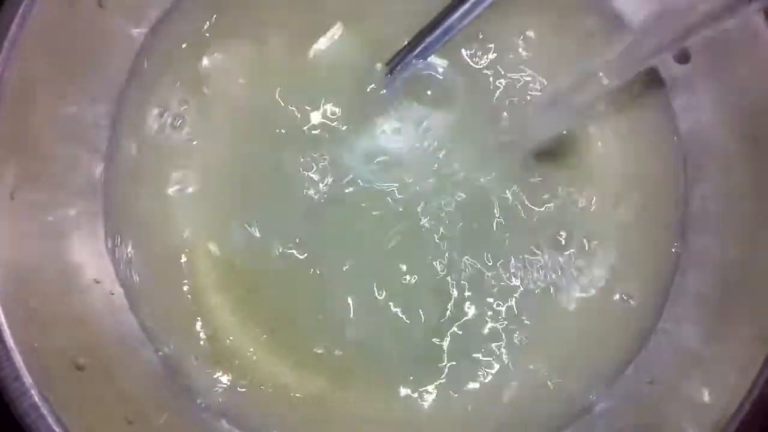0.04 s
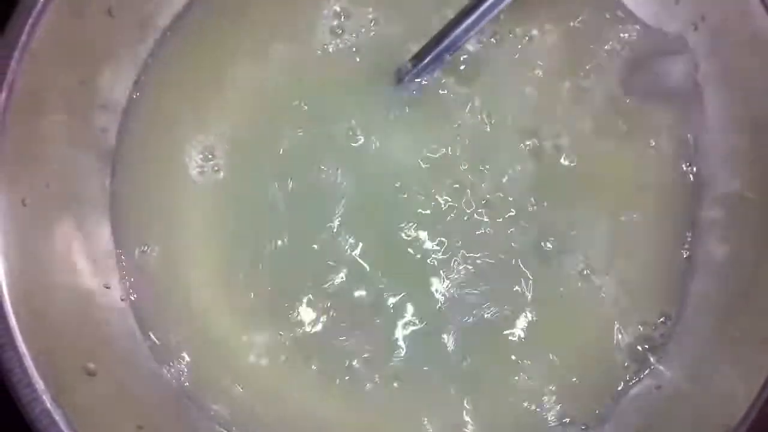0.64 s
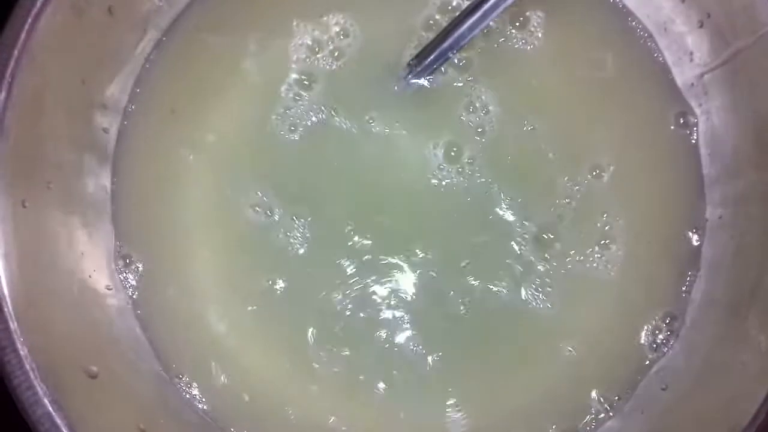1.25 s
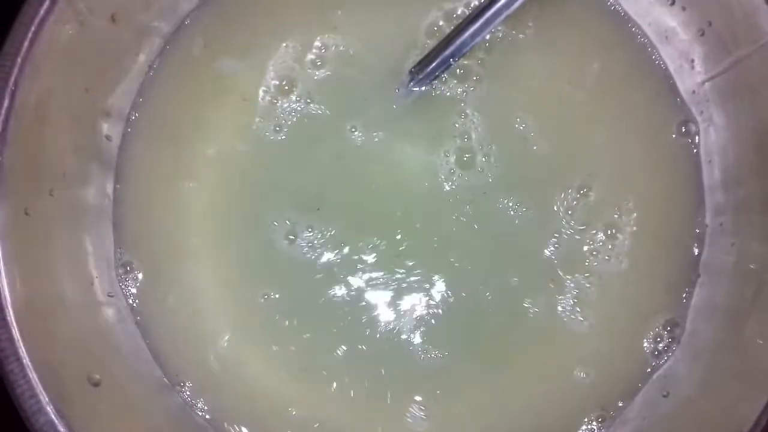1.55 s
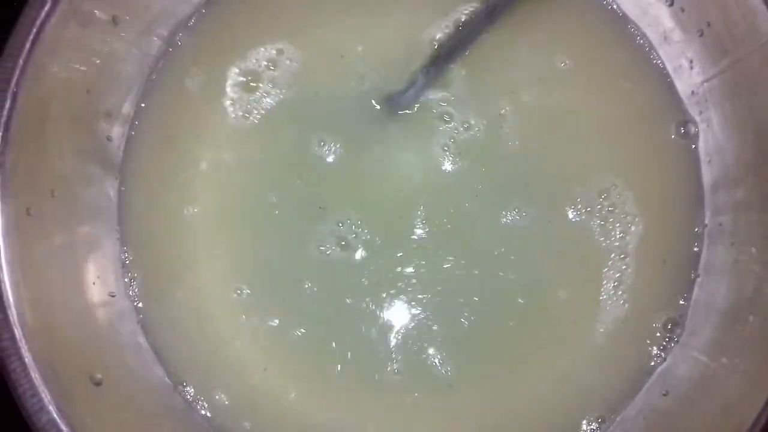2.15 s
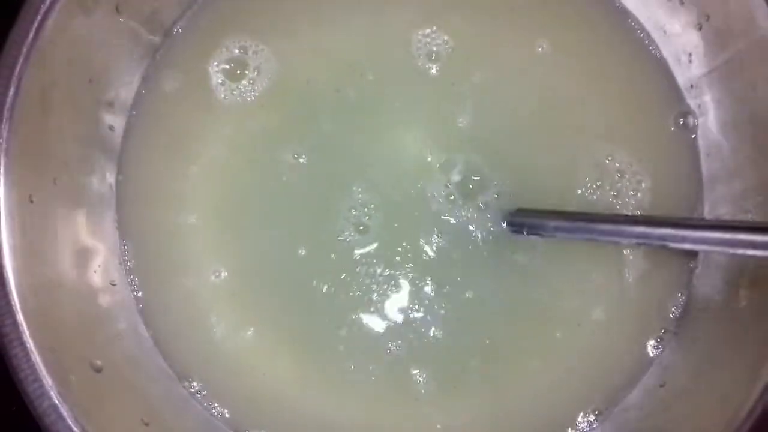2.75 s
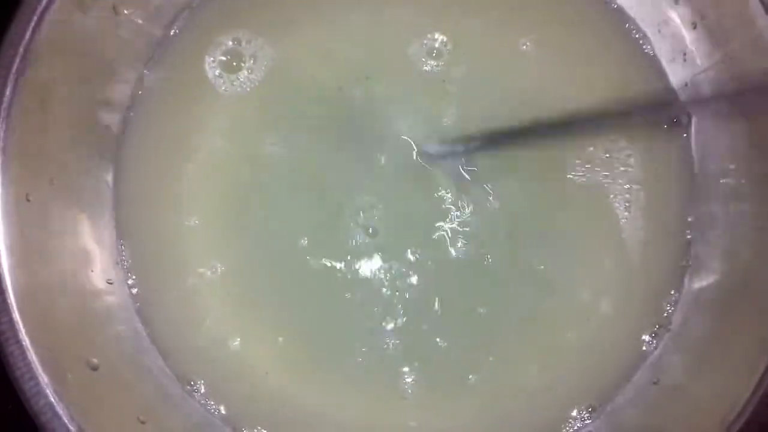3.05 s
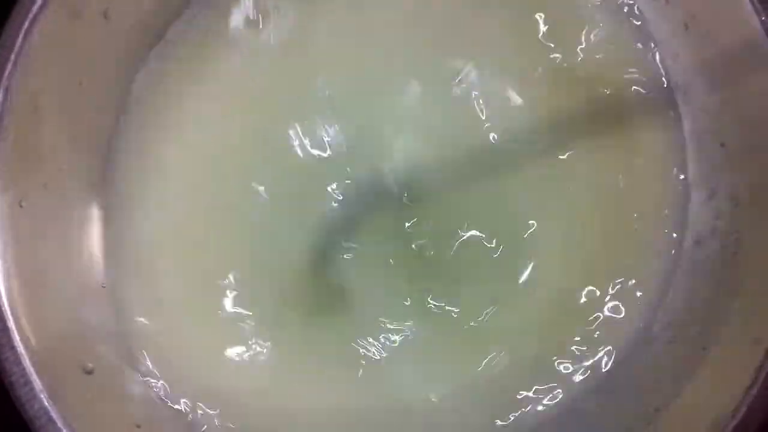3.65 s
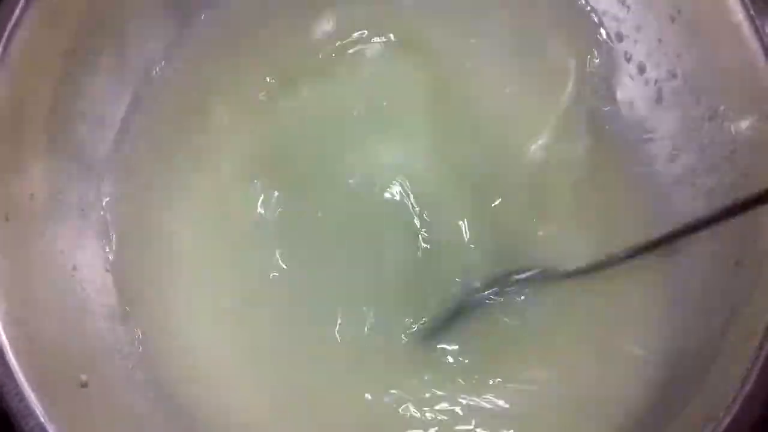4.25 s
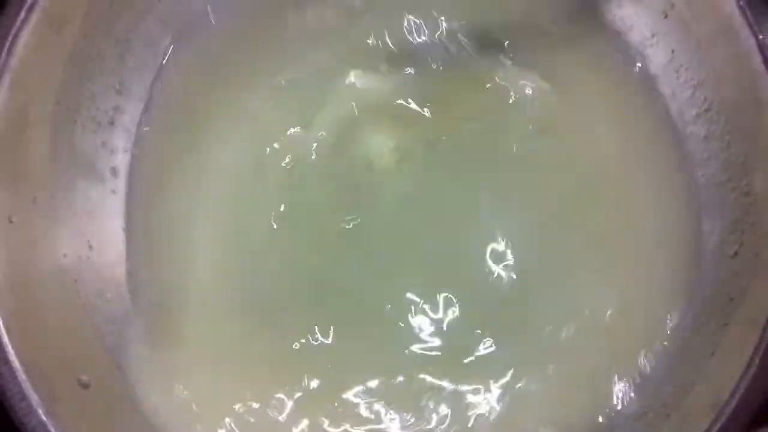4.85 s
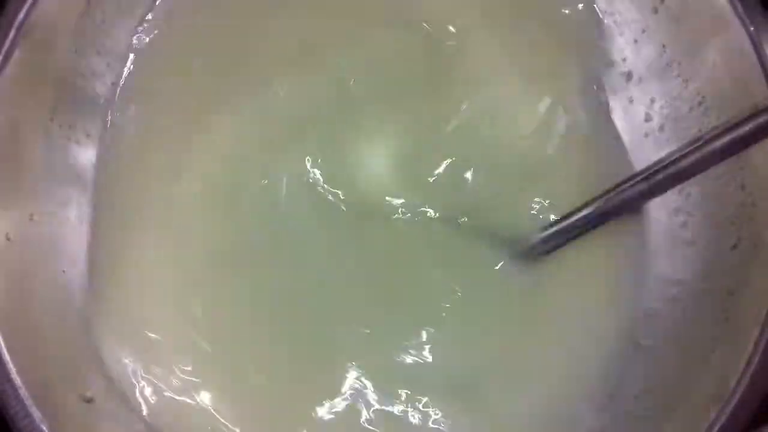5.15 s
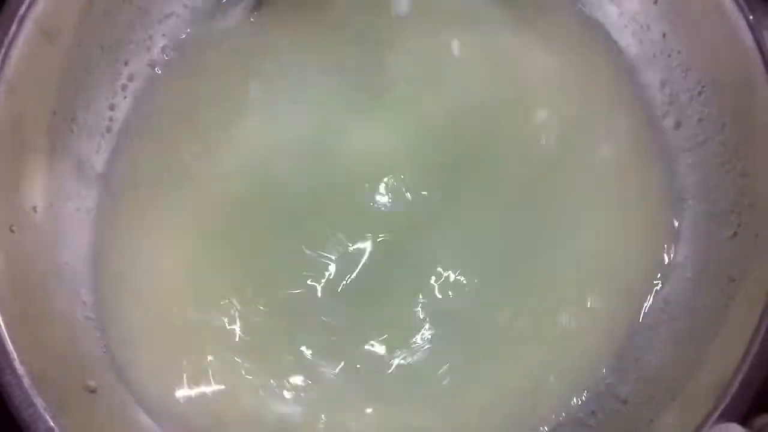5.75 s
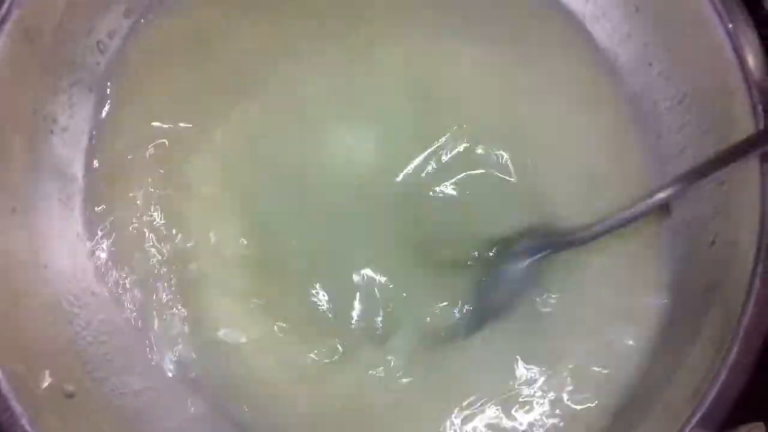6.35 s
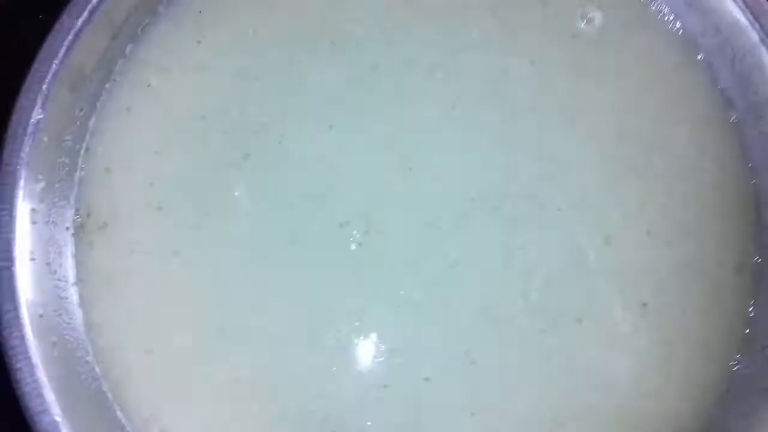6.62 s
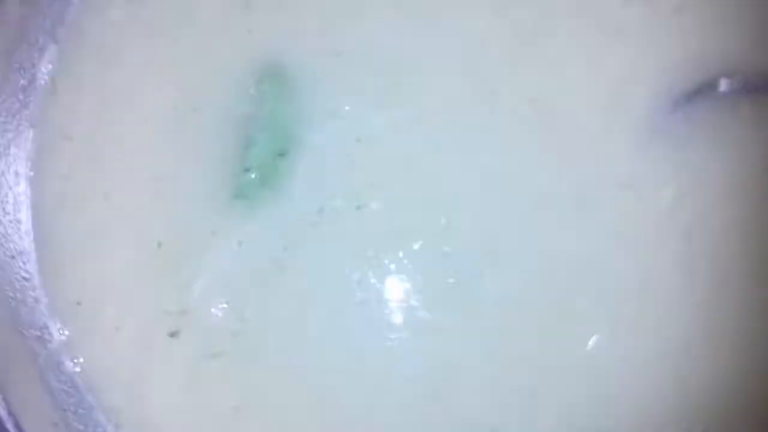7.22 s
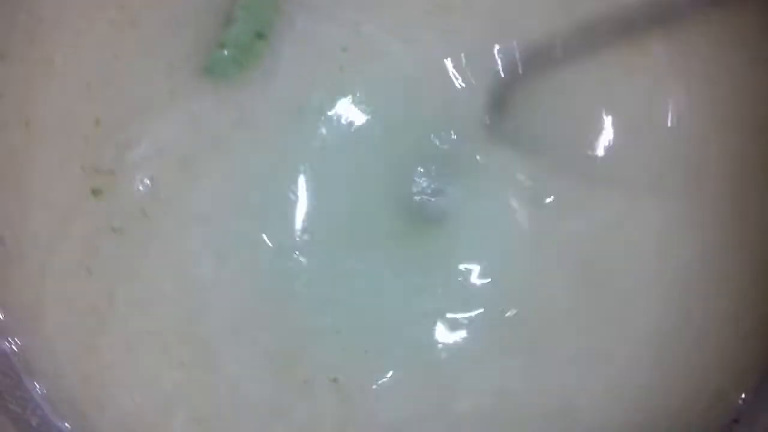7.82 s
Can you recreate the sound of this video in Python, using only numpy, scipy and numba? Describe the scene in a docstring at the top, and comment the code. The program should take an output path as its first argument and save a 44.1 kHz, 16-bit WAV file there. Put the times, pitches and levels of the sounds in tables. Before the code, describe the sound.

For the first 0.7 seconds a thin stream splashes into liquid in a steel bowl, with sharp drops and small gurgles. Foam then fizzes quietly until about 3.4 seconds. At 1.7 seconds a pan is set down nearby with a hollow boom. From 2.1 to 2.7 seconds a metal spoon slides and clatters brightly against the rim. The hardest clink, at 2.5 seconds, makes everything duck for over a second. From 3 seconds the spoon stirs in uneven strokes, scraping steel, sloshing and knocking under the liquid. A harsher scrape, several clinks and a tiny squeak come just after 4 seconds. Lighter stirring continues until 6.5 seconds, pauses, and returns at 7.6 seconds with plops, a clink and scraping. Everything sounds close, with a short small-room echo over steady kitchen noise. A faint, very high electric whine grows towards the end.

```python
"""A thin stream splashes into liquid in a steel bowl and leaves fizzing foam. A pan is set down
nearby with a hollow boom. Just after two seconds a metal spoon slides and clatters against the rim;
at the hardest clink the microphone's overload guard turns everything down for a while. Then the
spoon stirs, scraping the steel and knocking under the liquid. Kitchen noise and a thin whine lie
behind it all, and the whine grows towards the end."""
import sys
import numpy as np
from scipy import signal
from scipy.fft import rfft, irfft
from scipy.io import wavfile
from scipy.ndimage import uniform_filter1d
from numba import njit

SR = 44100
rng = np.random.default_rng(int(sys.argv[2]) if len(sys.argv) > 2 else 0)


def store_pcm(level_fs):
    """Save levels as 16-bit WAV."""
    pcm = np.round(np.clip(level_fs, -1, 1) * 32767).astype(np.int16)
    wavfile.write(sys.argv[1], SR, np.atleast_2d(pcm).T)


N = 351918
T = np.arange(N) / SR
RING = T[:SR].astype(np.float32)  # one second of time for a single hit
TOP_HZ = 16200
STROKE_ATTACK_S, DRAG_RELEASE_S = 0.013, 0.004  # the spoon leans in; a caught edge lets go at once

# the tones (modes) of the filled bowl and of the spoon: f/Hz, level/dB, time to fade by 60 dB/s
BOWL_MODES = [(980, -6.5, 0.51), (1480, -1.5, 0.28), (1940, 1, 0.12), (2121, -6, 0.41), (2640, 2.5, 0.09),
              (2770, -15, 0.11), (3450, -18, .14), (3940, -5.5, 0.37), (4230, -18, 0.23), (4500, -2, 0.24),
              (5100, -10, 0.15), (5334, -20, .18), (5490, 15.5, 0.052), (5730, -6, 0.25),
              (5600, 6.5, 0.183), (6660, -3, .28), (6900, -3, 0.18), (7500, -6, .2), (8530, -10, .16),
              (8545, -7.5, .16), (7800, -8, .16), (8900, -6, 0.2), (10370, -13, .13), (9911, -19, 0.18),
              (10230, -9.5, 0.17), (10400, -9, 0.11)]
SPOON_MODES = [(1376, -5, 0.38), (2440, -13.5, 0.201), (4748, -22, 0.82), (7060, -5, 0.3),
               (7680, 17.5, 0.095), (7573, -0.5, 0.26), (9070, -2.5, 0.86), (8650, -2.5, 0.56),
               (9440, -29, .27), (9270, -4, .2), (9900, 7, 0.087), (9701, -34, .25), (10400, -3, 0.46)]
# tone colours of a hit on the bowl's wall, a hit on the spoon, and landing drops: f/Hz, level/dB
WALL_COLOUR = [(150, -40.5), (700, -10.5), (1700, -7.5), (2700, -10), (3600, -13.5), (5600, -5),
               (7500, -0.5), (9000, 0.5), (10200, 1), (12000, -13), (15500, -31.5)]
SPOON_COLOUR = [(150, -64), (600, -22), (1300, -9), (3300, -17), (4600, -9), (6200, -14.5), (7700, 1),
                (9200, 3), (10200, -15.5), (12500, -29.5), (15500, -62)]
SPATTER_COLOUR = [(200, -34), (1000, -17.5), (3000, -15.5), (4500, -6.5), (5300, -4), (7000, -1.5),
                  (9200, 5.5), (10200, -2), (12300, -14), (15500, -34.5)]
# stirring strokes: t/s, length/s, rubbing/dB, sloshing/dB, spoon's share of the sound (0-1)
STROKES = [(2.96, 0.013, -32.5, -38.5, 1), (3.185, 0.042, -41.5, -42, 0.95), (3.261, 0.14, -43, -62, 0.95),
           (3.6, 0.25, -43.5, -57, 0.8), (3.946, 0.11, -43, -44, 0.9), (4.14, 0.047, -34, -29, 0.8),
           (4.275, 0.044, -43.5, -48, 0.9), (4.35, 0.058, -36.5, -64, 0.93), (4.442, 0.25, -45, -54, 0.45),
           (4.818, 0.11, -50, -40.5, 1), (4.902, 0.24, -41, -49.5, 0.53), (5.745, 0.084, -35.5, -50, 1),
           (5.843, 0.033, -35.5, -62, 0.98), (5.91, 0.055, -50.5, -60, 0.8), (6, 0.17, -49.5, -49, 0.74),
           (6.208, 0.16, -40, -44.5, 0.6), (6.391, 0.087, -38, -37, 0), (7.686, 0.26, -37.5, -66, 0.11),
           (7.915, 0.1, -35.5, -56, 0.54)]


def clatter():
    """The spoon hits the bowl and both ring; the hardest blow also jolts the bowl with a dull thud."""
    # hits: t/s, level/dB, spoon's share of the sound (0-1)
    clinks = [(2.126, -17, 0.3), (2.291, -27, 0.47), (2.315, -11.5, 0), (2.327, -21, 0), (2.342, -22.5, 0),
              (2.388, -12, 0.21), (2.431, -17.5, 0.2), (2.445, -14.5, 0.43), (2.461, -22.5, 0),
              (2.472, -24.5, 0), (2.483, -18, 0.7), (2.517, 2, 1), (2.547, -7, 1), (2.571, -3.5, 0.9),
              (2.608, -9, 1), (2.631, -11.5, 0.9), (4.034, -10.5, 0.37), (4.082, -20, 0.1),
              (4.127, -19.5, 0.3), (4.17, -18, 0.6), (4.914, -30.5, 0.77), (5.698, -32.5, 0.77),
              (5.72, -31.5, 0.6), (5.77, -26.5, 0.65), (7.628, -36.5, 0.44), (7.685, -21, 0.5)]
    out = np.zeros(N)
    for s, db, share in clinks:
        wall = steel(WALL_COLOUR, BOWL_MODES, crack_t60=0.029, grit_db=-18.5, ring_db=-7.5,
                     shimmer_db=-32, shimmer_t60=0.1735)
        spoon = steel(SPOON_COLOUR, SPOON_MODES, crack_t60=0.025, grit_db=-21, ring_db=-21.5,
                      shimmer_db=-13.5, shimmer_t60=0.57)
        glance = 1 - np.exp(-RING / 0.00053)  # a glancing hit builds up over a moment
        add(out, s, amp(db) * unit_start(glance * ((1 - share) * wall + share * spoon)))
    s, db, _ = max(clinks, key=lambda row: row[1])
    add(out, s + 0.0023, amp(db - 7.5) * sine(215) * fade(0.016))
    add(out, s + 0.00097, amp(db - 7) * burst(0.011, [(200, -5), (900, 5), (3000, -6), (9000, -10.5)]))
    return out


def scraping():
    """The spoon sticks and slips in tiny clicks: harsh on the dry wall, lighter under the liquid."""
    # hard drags on the dry wall: t/s, length/s, level/dB, lows and mids against the treble/dB
    drags = [(2.091, 0.025, -14.5, -5.5), (4.041, 0.11, -18, -0.5)]
    # tone colour of the wet wall: f/Hz, level/dB
    wet_colour = [(150, -26), (700, -27), (1300, -5), (1850, 5), (2700, -6), (3600, 3.5), (5000, -5.5),
                  (7000, -4), (8900, -4.5), (10200, -4.5), (12000, -22.5), (15500, -24)]
    slips = colour(clicks(rate=2900, spread_db=1.5),
                   [(400, -12), (2000, 3), (3500, 3.5), (6000, 2.5), (7500, -5.5), (9600, 7.5),
                    (12000, -5)])
    drag = on_bowl = on_spoon = 0
    for s, length, db, body_db in drags:
        shaped = colour(slips, [(100, body_db), (3000, body_db), (5500, 0)])
        drag += amp(db) * shaped * gate(s, length, STROKE_ATTACK_S, DRAG_RELEASE_S)
    drag *= amp(2 * drift(250))
    wet_slips = colour(clicks(rate=2200, spread_db=2),
                       [(200, -20), (2000, -2), (3800, -4), (5800, 3), (9500, 1.5), (13000, 7.5)])
    rub = wet_slips * amp(2 * drift(45) - 1.5)
    for s, length, db, _, share in STROKES:
        force = amp(db) * gate(s, length, STROKE_ATTACK_S, release_s=0.026)
        on_bowl += force * np.sqrt(1 - share)
        on_spoon += force * np.sqrt(share)
    return (slide(drag, WALL_COLOUR, BOWL_MODES, ring_db=-22.5)
            + slide(rub * on_bowl, wet_colour, BOWL_MODES, ring_db=-21)
            + slide(rub * on_spoon, SPOON_COLOUR, SPOON_MODES, ring_db=-22))


def steel(points, modes, crack_t60, grit_db, ring_db, shimmer_db, shimmer_t60):
    """One touch on metal: a crack, then tones and a noisy shimmer that liquid and hand cut short."""
    tones = amp(ring_db) * unit_start(ring(modes, scatter_db=2.9))
    shimmer = amp(shimmer_db) * burst(shimmer_t60, points)
    return crack(crack_t60, points, grit_db) + fade(0.55) * (tones + shimmer)


def slide(force, points, modes, ring_db, count=5):
    """A rubbing edge moves between spots on the metal that each ring in their own way."""
    weights = amp([10 * drift(22) for _ in range(count)])
    weights /= np.linalg.norm(weights, axis=0)
    spots = [steel(points, modes, crack_t60=0.0077, grit_db=-1.5, ring_db=ring_db,
                   shimmer_db=-37, shimmer_t60=0.11) for _ in range(count)]
    return sum(through(force * w, spot / np.linalg.norm(spot)) for w, spot in zip(weights, spots))


def squeaking():
    """For a moment the slips fall in step with a tone of the metal: a rough, wavering squeak."""
    # the edge catches: t/s, length/s, level/dB, f/Hz
    squeaks = [(4.104, 0.05, -32, 1900), (6.396, 0.051, -37, 1900)]
    # tones in a squeak: multiple of its pitch, level/dB
    partials = [(1, 3), (2.58, -3.5)]
    wavering_time = np.cumsum(1 + 0.066 * drift(300)) / SR
    out = np.zeros(N)
    for s, length, db, hz in squeaks:
        tone = sum(amp(part_db) * sine(hz * multiple, wavering_time) for multiple, part_db in partials)
        out += amp(db) * tone * gate(s, length, STROKE_ATTACK_S, DRAG_RELEASE_S)
    return out * amp(2.8 * drift(200))


def splashing():
    """The stream spatters and whips tiny bubbles into the surface; single drops snap sharply."""
    # the biggest drops: t/s, level/dB
    big_drops = [(0.214, -15), (0.231, -25.5), (0.307, -22.5), (0.414, -27), (0.473, -17.5), (0.586, -22.5),
                 (0.621, -23), (0.643, -22.5), (0.658, -19.5), (0.689, -22.5), (0.698, -20)]
    spray = unit(colour(clicks(rate=4300, spread_db=4.5), SPATTER_COLOUR))
    tiny_bubbles = bubbles(low_hz=2200, high_hz=10800, cycles=17, spread_db=24, seconds=1.4, count=2400)
    fizz = unit(colour(tiny_bubbles, SPATTER_COLOUR))
    spatter, _ = pouring()
    out = (amp(-4.5) * fizz + amp(4) * spray) * spatter
    # smaller drops fall at random as the stream breaks up: t/s, level/dB
    small_drops = [(rng.uniform(0.3, 0.72), -31 + 2 * rng.standard_normal()) for _ in range(11)]
    for s, db in big_drops + small_drops:
        snap = crack(0.011, SPATTER_COLOUR, grit_db=-7, count=8)
        add(out, s, amp(db) * unit_start(snap, size=132))
    return out


def sloshing():
    """Stream and spoon churn the liquid: a wash of small splashes with short, low bubbles in it."""
    # tone colour of the wash: f/Hz, level/dB
    wash_colour = [(120, -27.5), (300, -9), (550, -7), (900, 2), (1400, -4), (2200, -4), (3200, -6.5),
                   (8000, -21)]
    gurgle = bubbles(low_hz=685, high_hz=2770, cycles=13, spread_db=25.5, seconds=N / SR, count=2200)
    wash = unit(colour(clicks(rate=1500, spread_db=4), wash_colour))
    _, poured = pouring()
    stirred = sum(amp(db) * gate(s, length, STROKE_ATTACK_S, release_s=0.019)
                  for s, length, _, db, _ in STROKES)
    return (amp(-8) * gurgle + amp(-5.5) * wash) * (poured + stirred)


def pouring():
    """How strong the spatter and the gurgle of the pour are over time."""
    # gushes of the stream, and the foam after them: t/s, length/s, spatter/dB, gurgle/dB
    gushes = [(0, 0.012, -44.5, -46), (0.042, 0.098, -47.5, -39.5), (0.206, 0.028, -34.5, -32.5),
              (0.258, 0.461, -47, -40.5)]
    foam = [(0.705, 2.7, -55.5, -53), (1.099, 0.1, -56, -42)]
    strength = np.zeros((2, N))
    for rows, attack_s, release_s in ((gushes, 0.0075, 0.018), (foam, 0.14, 0.05)):
        for s, length, spatter_db, gurgle_db in rows:
            strength += amp([[spatter_db], [gurgle_db]]) * gate(s, length, attack_s, release_s)
    return strength


def plops():
    """A tick and a gulp of trapped air; small bubbles chirp upwards, big ones also ring the bowl."""
    # plops and knocks under the liquid: t/s, level/dB, f/Hz, tick against that level/dB
    knocks = [(0.075, -40.5, 836, -20), (0.134, -31, 1700, -20), (0.307, -32, 1190, -17),
              (0.568, -36.5, 1020, -20), (0.623, -33, 1050, -25), (3.139, -42.5, 980, -13),
              (3.183, -39.5, 1120, -13), (3.36, -34, 980, 3.5), (3.624, -22, 1003, -3.5),
              (3.82, -35.5, 920, -5), (3.859, -23, 940, -17), (4.014, -32, 790, 1), (4.17, -20, 970, -20),
              (4.452, -26, 1100, 1.5), (4.665, -37.5, 1330, -2), (4.733, -28.5, 1100, -6),
              (4.785, -23, 2100, -27), (4.92, -27, 1360, -5), (5.082, -35.5, 740, -8),
              (5.124, -34, 810, -4.5), (5.254, -49, 1010, 11.5), (7.557, -27.5, 1500, -7),
              (7.686, -24, 1440, -17)]
    out = np.zeros(N)
    for s, db, hz, tick_db in knocks:
        hollow = [(hz / 6, -22), (hz / 2, -15), (hz, 0), (hz * 1.78, -11), (hz * 4, -25), (hz * 9, -42)]
        add(out, s, amp(db + 7) * bubble(hz, cycles=10.7, glide=0.08 * (hz / 1100) ** 2))
        add(out, s, amp(db + 1.3) * min(1, 1250 / hz) ** 3 * burst(0.075, hollow))
        add(out, s, amp(db + tick_db) * burst(0.013, SPATTER_COLOUR))
    return out


def swaying(hz=124, t60=0.41, rise_s=0.017):
    """A soft push sets the full bowl humming on its lowest tone."""
    # pushes: t/s, level/dB
    pushes = [(0, -28.5), (2.219, -44.5), (2.663, -36.5), (4.521, -40.5)]
    out = np.zeros(N)
    for s, db in pushes:
        add(out, s, amp(db) * sine(hz) * fade(t60) * (1 - np.exp(-RING / rise_s)))
    return out


def pan(landing_s=1.663, bounce_s=0.018):
    """A pan lands and bounces once; its two lowest tones throb, and the boom lingers in the room."""
    # tones of the pan: f/Hz, level/dB, time to fade by 60 dB/s
    pan_modes = [(178.4, -1, 0.59), (217.3, 3, 0.44), (240, -4.5, 0.35), (366, -21.5, 0.61),
                 (496.4, -21.5, 0.55), (664, -30, 0.45), (828, -16, 0.26), (1247, -21.5, 0.31),
                 (1410, -24, 0.42), (1370, -29.5, 0.7), (1545, -22.5, 0.24), (2240, -14, .38),
                 (2220, -9.5, 0.22), (2520, -19.5, 0.34), (2540, -30, 0.19), (2790, -28, 0.48)]
    # tone colour of its landing: f/Hz, level/dB
    pan_colour = [(100, -19.5), (230, -13.5), (450, -12.5), (850, -3), (1300, -12.5), (1750, 1.5),
                  (2050, -15), (2300, 0.5), (2600, -11), (3100, -20), (6000, -27.5), (9000, -18.5),
                  (15000, -44)]
    out = np.zeros(N)
    add(out, landing_s, amp(-11.5) * ring(pan_modes, scatter_db=0))
    add(out, landing_s, amp(-23.5) * burst(0.48, pan_colour))
    boom = unit(noise(SR, [(160, -11.5), (200, 0), (280, -18), (700, -37), (4000, -76.5)]))
    add(out, landing_s, amp(-20.5) * boom * fade(0.77))
    for s, db in ((landing_s, -11), (landing_s + bounce_s, -33)):
        add(out, s, amp(db) * burst(0.01, pan_colour))
    return out


def room_echo(x, t60, treble_t60):
    """The hard walls of a small room blur the sound into an echo; the treble dies sooner."""
    low = noise(SR, [(100, -0.5), (1200, 2.5), (3000, 2.5), (8000, -12)]) * fade(t60)
    high = noise(SR, [(1500, -20), (5000, 5.5), (10000, -17), (15000, -9.5)]) * fade(treble_t60)
    tail = (low + high) * (RING > 0.006)
    return through(x, tail / np.linalg.norm(tail))


def kitchen():
    """Steady room noise that wavers slightly."""
    # its tone colour: f/Hz, level/dB
    room_colour = [(30, -27.5), (55, -25.5), (100, -11), (160, -4), (260, 0), (450, -4), (750, -9),
                   (1100, -7), (2600, -17.5), (6500, -23.5), (7900, -24), (9000, -17), (10500, -29.5),
                   (12500, -37.5)]
    return unit(noise(N, room_colour + [(14500, -40), (16200, -49)])) * amp(-45 + 0.56 * drift(3.5))


def whine(hz=15624, waver_hz=8):
    """A thin electric tone that flutters in pitch and level."""
    # its rise and fall: t/s, level/dB
    levels = [(4.3, -65), (4.38, -63), (5.93, -56), (6.81, -65.5), (6.94, -56), (7.98, -52)]
    turns = np.cumsum(hz + waver_hz * drift(90)) / SR
    level_db = np.interp(T, *np.transpose(levels)) + 1.2 * drift(20)
    return unit(np.sin(2 * np.pi * turns)) * amp(level_db)


def microphone_hiss():
    """The faint noise that the microphones make themselves."""
    hiss = noise(N, [(30, 7), (700, 8), (1500, -8), (5000, -2.5), (8500, 8.5), (12000, 1), (15000, -6)])
    return amp(-70.5) * unit(hiss)


def crack(t60, points, grit_db, count=22, size=4096):
    """The instant of a hit: a few random tones that die at once, with some gritty noise."""
    hz = (np.arange(count) + rng.random(count)) / count * TOP_HZ
    tones = np.sin(2 * np.pi * (hz[:, None] * RING[:size] + rng.random((count, 1)))).sum(axis=0)
    hit = (unit(tones) + amp(grit_db) * rng.standard_normal(size)) * fade(t60)[:size]
    return unit_start(colour(np.pad(hit, (0, SR - size)), points))


def ring(modes, scatter_db):
    """Fading tones, every second one flipped; their balance depends on the spot that is struck."""
    sizes = amp(scatter_db * rng.standard_normal(len(modes)))
    return sum((-1) ** k * sizes[k] * amp(db) * sine(hz) * fade(t60)
               for k, (hz, db, t60) in enumerate(modes))


def burst(t60, points):
    """Fading noise, like many close vibrations at once."""
    return unit_start(colour(rng.standard_normal(SR) * fade(t60), points))


def clicks(rate, spread_db):
    """Tiny random hits, about `rate` a second, a few much stronger than the rest."""
    sizes = amp(spread_db * np.minimum(rng.exponential(size=N), 4))
    return unit((rng.random(N) < rate / SR) * sizes * rng.choice([-1, 1], N))


def bubble(hz, cycles, glide):
    """An air pocket rings for some cycles and rises in pitch as it surfaces."""
    turn = RING[:int(cycles / hz * SR)] * hz
    tone = np.sin(2 * np.pi * turn * (1 + glide * turn / cycles))
    return tone * (1 - np.exp(-turn)) * np.exp(-np.log(100) * turn / cycles)


def bubbles(low_hz, high_hz, cycles, spread_db, seconds, count):
    """Bubbles of random size at random moments, a few much louder than the rest."""
    out = np.zeros(N)
    for when, pitch, strength in rng.random((count, 3)):
        hz = low_hz * (high_hz / low_hz) ** pitch
        add(out, when * seconds, amp(spread_db * strength ** 4) * bubble(hz, cycles, glide=0.057))
    return unit_start(out, size=int(seconds * SR))


def colour(x, points, size=2048):
    """Filter x to a tone colour of (f/Hz, level/dB) points, falling away below the first."""
    hz, db = np.transpose(points)
    grid = np.maximum(np.fft.rfftfreq(2 * size, 1 / SR), 1)
    gain = amp(np.interp(np.log(grid), np.log(hz), db)) * np.minimum(grid / hz[0], 1) ** 2
    cepstrum = irfft(np.log(gain))[:size]  # keep one half, so nothing rings before a hit
    cepstrum[1:] *= 2
    return through(x, irfft(np.exp(rfft(cepstrum, 2 * size))))


def noise(size, points):
    """Noise with a given tone colour."""
    return colour(rng.standard_normal(size), points)


def drift(rate):
    """Smooth random wandering of about 1 either way, with `rate` steps a second."""
    k = int(SR / rate)
    steps = np.repeat(rng.standard_normal(N // k + 1), k)
    return unit(uniform_filter1d(uniform_filter1d(steps, k), k)[:N])


def gate(start, length, attack_s, release_s):
    """Strength of one movement: it rises, holds, and dies away once its length is over."""
    age = T - start
    return np.clip(age / attack_s, 0, 1) * np.exp(-np.clip((age - length) / release_s, 0, 30))


def fade(t60):
    """A one-second curve that falls by 60 dB every t60 seconds."""
    return np.exp(-np.log(1000) * RING / t60)


def sine(hz, t=RING):
    """A pure tone."""
    return np.sin(2 * np.pi * hz * t)


def amp(db):
    """Turn decibels into a gain."""
    return 10 ** (np.asarray(db) / 20)


def unit(x):
    """Scale to an average (rms) level of 1."""
    return x / np.sqrt(np.mean(x ** 2))


def unit_start(x, size=220):
    """Scale so that the first samples have an average (rms) level of 1."""
    return x / np.sqrt(np.mean(x[:size] ** 2))


def add(track, s, sound):
    """Mix a sound in at s seconds."""
    i = max(int(s * SR), 0)
    track[i:i + len(sound)] += sound[:N - i]


def through(x, response):
    """Play x through something, given its response to one click."""
    return signal.fftconvolve(x, response)[:len(x)]


def scene():
    """All sounds in the room, nearly mono; one narrow treble band leans to the right."""
    near = clatter() + scraping() + squeaking() + splashing() + sloshing() + plops() + swaying() + pan()
    mid = near + amp(-14) * room_echo(near, t60=0.55, treble_t60=0.41) + kitchen() + whine()
    band_hz, width_hz = 7980, 800
    band = signal.lfilter(*signal.iirpeak(band_hz, band_hz / width_hz, fs=SR), mid)
    side = microphone_hiss() - 0.39 * band
    return np.array([mid + side, mid - side])


@njit
def overload_guard(level, limit, floor_db, fall_db_per_s, hold_s, rise_db_per_s):
    """Gain in dB: drops fast when the level passes the limit, holds, then creeps back."""
    out, db, wait = np.zeros(len(level)), 0., 0.
    for i in range(len(level)):
        wait = hold_s if level[i] > limit else wait - 1 / SR
        db = max(db - fall_db_per_s / SR, floor_db) if wait > 0 else min(db + rise_db_per_s / SR, 0.)
        out[i] = db
    return out


def record(dry):
    """The guard, deaf to bass, ducks ahead of a very loud peak; peaks clip and the top treble is cut."""
    heard = signal.sosfilt(signal.butter(2, 1000, "high", fs=SR, output="sos"), dry.mean(axis=0))
    level = np.sqrt(np.abs(uniform_filter1d(heard ** 2, size=220)))
    coming = np.roll(level, -int(0.024 * SR))  # look 24 ms ahead
    gain_db = overload_guard(coming, limit=0.62, floor_db=-12., fall_db_per_s=1200.,
                             hold_s=1.06, rise_db_per_s=14.)
    out = np.clip(dry * amp(gain_db), -1, 1)
    return signal.sosfilt(signal.ellip(8, 0.2, 70, TOP_HZ, fs=SR, output="sos"), out)


dry = scene()
out = record(dry)
store_pcm(out)
```